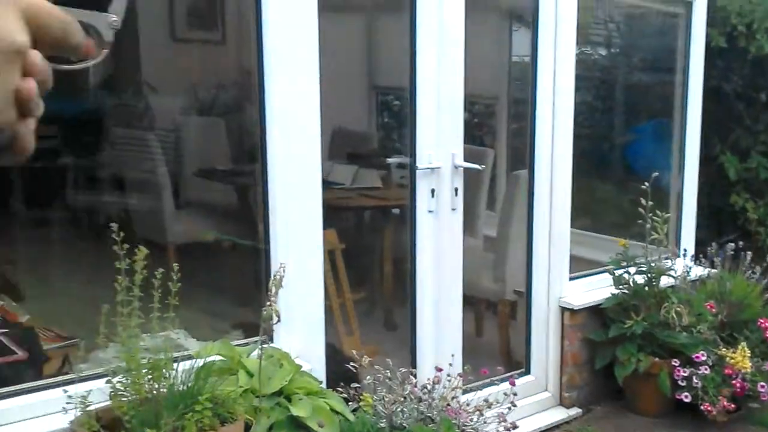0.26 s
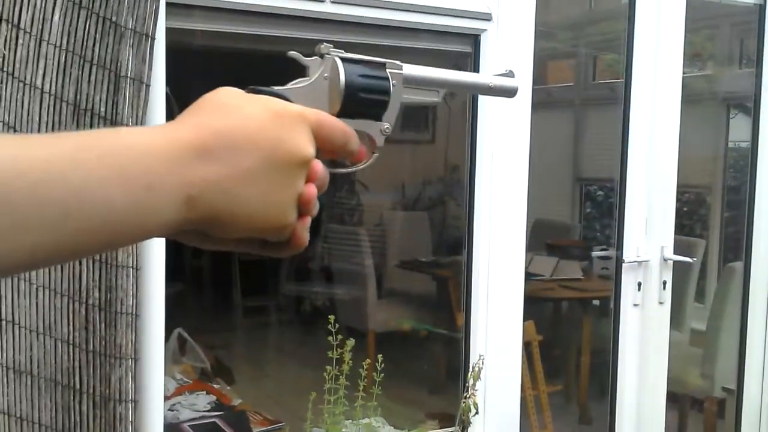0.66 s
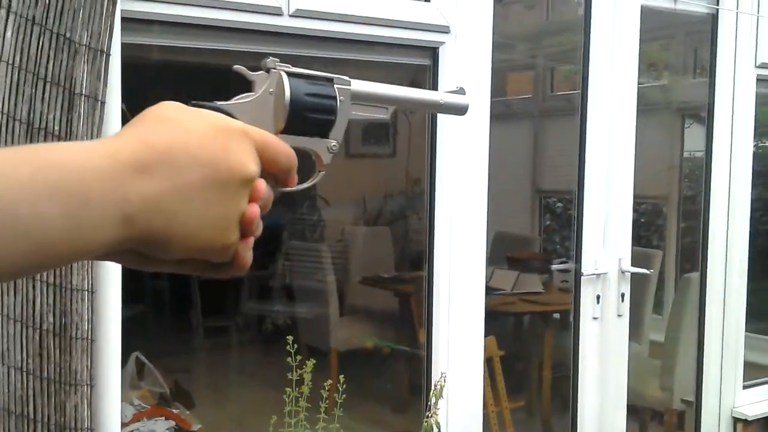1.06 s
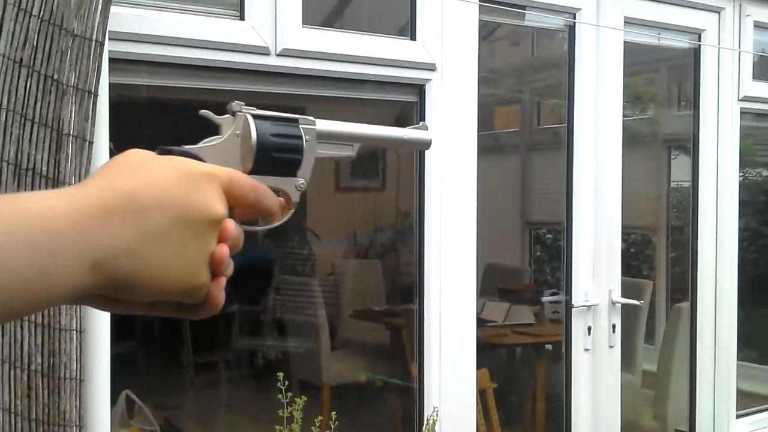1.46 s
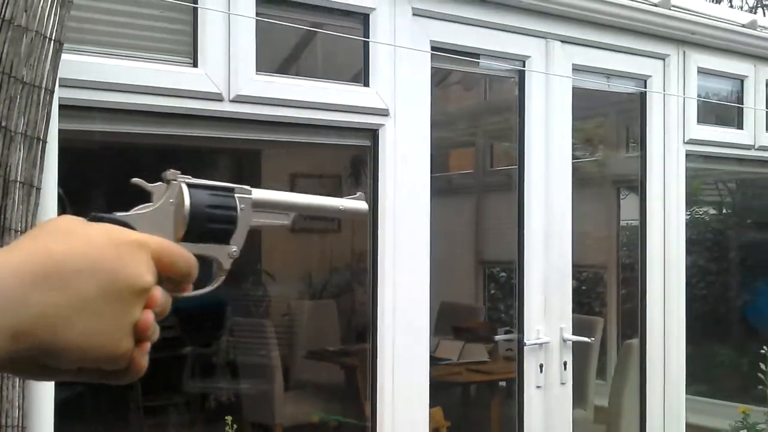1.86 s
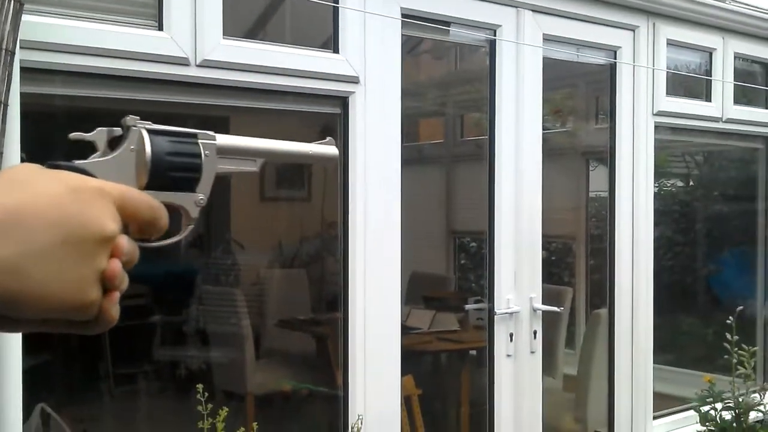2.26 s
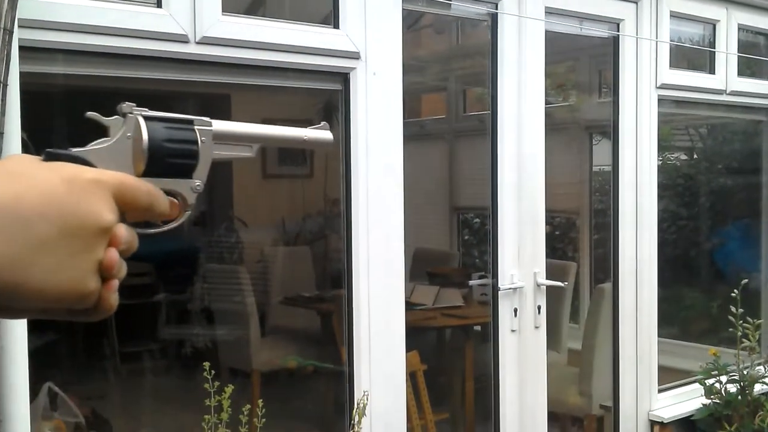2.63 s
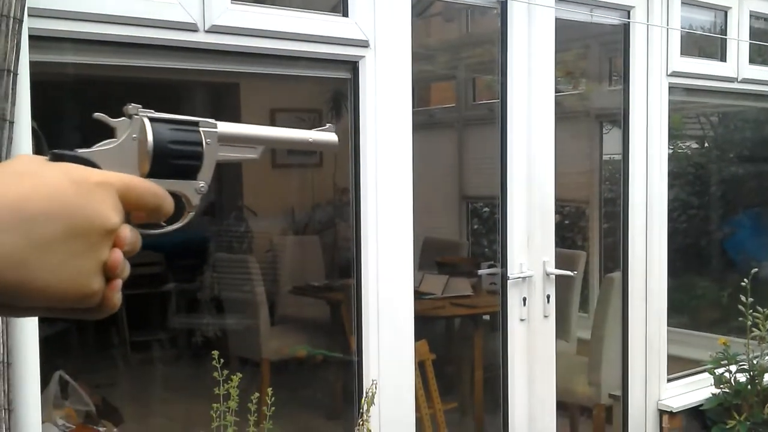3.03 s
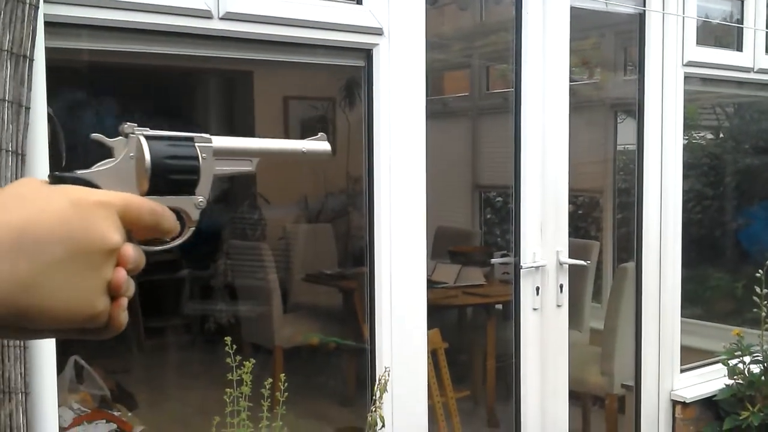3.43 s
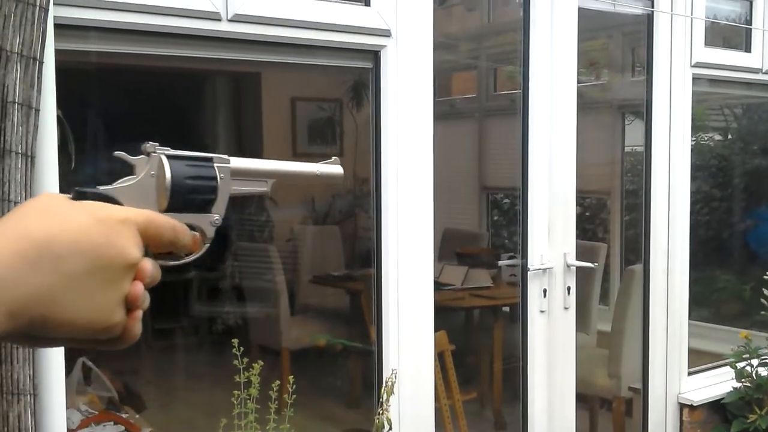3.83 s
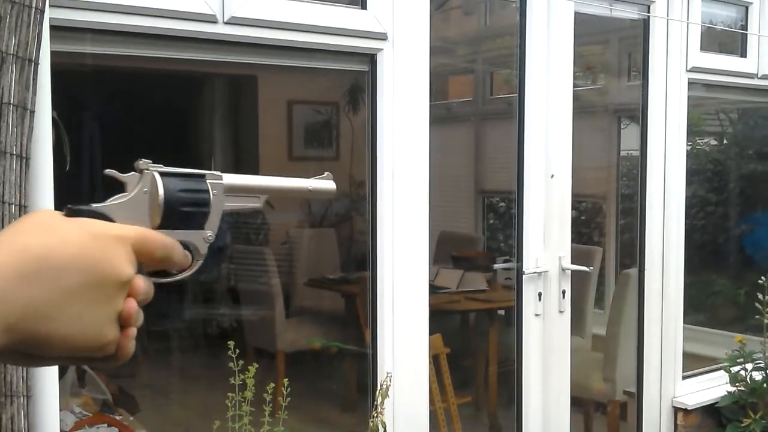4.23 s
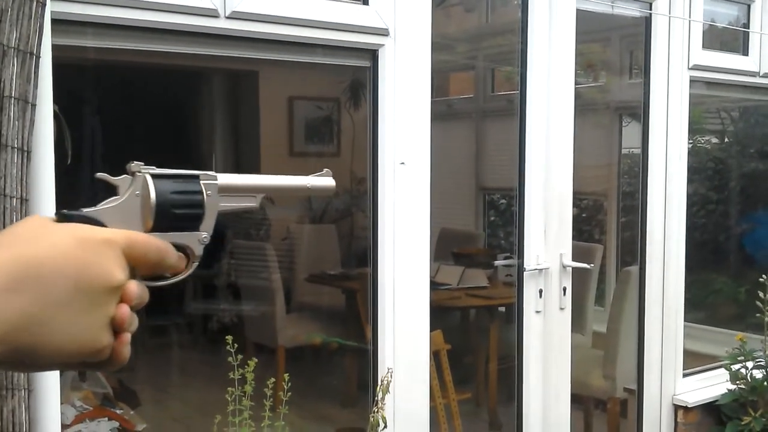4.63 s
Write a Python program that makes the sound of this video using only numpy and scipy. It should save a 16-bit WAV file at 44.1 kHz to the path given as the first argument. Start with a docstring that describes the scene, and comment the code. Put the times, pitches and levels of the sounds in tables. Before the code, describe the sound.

A toy cap revolver fires three sharp bangs in a quiet garden, with metallic hammer clacks and trigger clicks between them.

```python
"""Toy revolver in a garden

A die-cast toy revolver is worked close to the microphone, beside a glass conservatory. Each pull drops
the hammer: three caps explode and overload the input, the other pulls only clack. The trigger clicks
back between pulls. Glass, paving and a far house answer, over faint garden air and a light breeze."""
import sys
import numpy as np
from scipy import signal
from scipy.fft import rfft, irfft, next_fast_len
from scipy.io import wavfile
from scipy.ndimage import map_coordinates

SR = 44100
rng = np.random.default_rng(int(sys.argv[2]) if len(sys.argv) > 2 else 0)


def pcm_store(signal):
    """Save signal as 16-bit PCM."""
    levels = np.round(np.clip(np.atleast_2d(signal), -1, 1) * 32767)
    wavfile.write(sys.argv[1], SR, levels.astype(np.int16).T)


N = 215693
T = np.arange(SR // 2) / SR  # seconds within one short sound
CLOCK = np.arange(N) / SR  # seconds within the scene
STRIKE_RISE_S = 0.0013  # a metal contact takes this long to build up

# exploding caps: start_s, blast_db, blast_t60_s, echo_db, tilt_db_per_octave,
# push_db, push_hz, push_t60_s, lock_db
CAP_SHOTS = [(1.083, 5, 0.041, -18, 0.64, -1, 46, 0.032, -38),
             (3.207, 6.5, 0.06, -16.5, 0.07, 19.5, 128.6, 0.0067, -68),
             (3.637, 8, 0.062, -16, 0.04, 16, 75, 0.022, -54)]
# hammer falls on dead caps: start_s, level_db, ring_db, sear_db, lock_db
DEAD_PULLS = [(1.7311, -19.5, -4, -16, -50), (2.3431, -13.5, -25, -25.5, -64),
              (2.7952, -23.5, -13, -18.5, -52), (4.0277, -21, -16, -14, -64),
              (4.8787, -21.5, -15, -11, -64)]
# spectrum of the hammer and sear contacts: frequency_hz, level_db
CLACK_COLOUR = [(150, -39), (400, -23.5), (800, -18), (1200, -14.5), (1900, -8), (2700, -15.5), (3900, -2),
                (4800, -1), (5900, -5), (7400, -18), (8400, -14), (12500, -25), (16000, -24)]
# modes of the gun's cast frame: pitch_hz, level_db, t60_s
FRAME_MODES = [(1514, 0, 0.048), (1694, -7, .04), (1844, -4.5, 0.087), (2190, -2.5, .032),
               (2300, -3, 0.026), (3754, 3.5, 0.024), (5870, 1, 0.036), (8140, -3, 0.011)]


def amp(db):
    """Decibels to gain."""
    return 10 ** (np.asarray(db) / 20)


def unit(x):
    """Scale to rms 1."""
    return x / np.sqrt(np.mean(x ** 2) + 1e-20)


def along(points, hz):
    """Read (frequency_hz, value) points on a log frequency axis."""
    knots_hz, values = np.transpose(points)
    return np.interp(np.log(hz + 1), np.log(knots_hz + 1), values)


def fade(t60, t=T):
    """Exponential decay by 60 dB in t60 seconds."""
    return np.exp(-np.log(1000) * t / np.maximum(t60, 1e-4))


def swell(middle_s, half_s, t=CLOCK):
    """A bell-shaped rise and fall."""
    return np.exp(-((t - middle_s) / half_s) ** 2)


def wobble(rate):
    """A smooth random curve, rate knots a second."""
    return map_coordinates(rng.standard_normal(int(N * rate / SR) + 4), [CLOCK * rate])


def add(track, start_s, sound):
    """Mix a sound into the track."""
    start = max(round(start_s * SR), 0)
    part = track[start:start + len(sound)]
    part += sound[:len(part)]


def coloured(x, spectrum):
    """Causal filter of the given spectrum that keeps the power of white noise."""
    size = 2 * next_fast_len(len(x))
    gain = unit(amp(along(spectrum, np.fft.rfftfreq(size, 1 / SR))))
    cepstrum = irfft(np.log(np.maximum(gain, 1e-6)))
    # minimum phase: nothing sounds ahead of the strike
    cepstrum[1:size // 2] *= 2
    cepstrum[size // 2 + 1:] = 0
    return irfft(rfft(x, size) * np.exp(rfft(cepstrum)))[:len(x)]


def burst(envelope):
    """White noise carrying the energy of its envelope."""
    noise = rng.standard_normal(len(T)) * envelope
    return unit(noise) * np.sqrt(np.mean(envelope ** 2))


def contact(rise_s, t60):
    """Loose parts scrape together for an instant, then strike."""
    return burst(np.minimum(T / rise_s, 1) ** 2 * fade(t60, np.maximum(T - rise_s, 0)))


def ring(modes, rise_s):
    """Damped metal modes, struck at new strengths every time."""
    tones = np.zeros(len(T))
    for hz, db, t60 in modes:
        strength, detune, phase = rng.standard_normal(3)
        cycles = hz * (1 + 0.00077 * detune) * T + phase
        tones += amp(db + 2 * strength) * fade(t60) * np.sin(2 * np.pi * cycles)
    return tones * np.minimum(T / rise_s, 1) ** 2


def garden_air():
    """A soft, nearly even hiss lies behind everything."""
    # course of the hiss: time_s, level_db
    hiss_levels = [(0, -62.5), (.7, -65), (2.6, -63.5), (4.15, -63), (4.45, -66)]
    # spectrum of the hiss: frequency_hz, level_db
    air_colour = [(100, -6), (350, -8), (700, -11), (1300, -13), (2400, -16.5), (3300, -12.5), (4000, -8),
                  (4700, -5.5), (5800, -18.5), (7500, -19.5), (9000, -27.5), (16000, -28.5)]
    level = amp(np.interp(CLOCK, *np.transpose(hiss_levels)))
    return level * unit(coloured(rng.standard_normal(N), air_colour))


def breeze(calm_db=-65.5, gust_db=8, flutter_db=1.5):
    """Wind rumbles on the microphone, with one broad gust and a few puffs."""
    # spectrum of the rumble: frequency_hz, level_db
    wind_colour = [(12, -25.5), (20, 4.5), (51, 0), (216, -18.5), (274, -29.5), (300, -32.5), (390, -45),
                   (660, -120)]
    # strongest puffs of wind: middle_s, level_db
    puffs = [(0.02, -50.5), (2.34, -55), (3.063, -53.5), (3.429, -52), (4.217, -53)]
    rumble = unit(coloured(rng.standard_normal(N), wind_colour))
    flow = amp(calm_db + gust_db * swell(3.55, half_s=0.6) + flutter_db * wobble(rate=5.6))
    flow += sum(amp(db) * swell(middle_s, half_s=0.035) for middle_s, db in puffs)
    return flow * rumble


def pawl(lock_lead_s=0.025):
    """The pawl ticks as it reseats, and the cylinder locks just before the hammer falls."""
    # the pawl ticks as it reseats, most soon after the trigger springs back: start_s, level_db
    reseat_ticks = [(0.840, -51), (1.0117, -44), (2.675, -43), (3.046, -45), (3.520, -38), (3.922, -42)]
    # spectrum of the tick: frequency_hz, level_db
    tick_colour = [(300, -35), (1000, -24), (1900, -14.5), (2700, -13.5), (3800, -2.5), (4650, 2.5),
                   (5800, -14), (8000, -20), (16000, -39.5)]
    locks = [(start_s - lock_lead_s, lock_db) for start_s, *_, lock_db in CAP_SHOTS + DEAD_PULLS]
    for events, tick_db, ring_db in [(reseat_ticks, -0.5, -15), (locks, -5, 0.5)]:
        for start_s, db in events:
            tick = amp(tick_db) * coloured(contact(STRIKE_RISE_S, t60=0.0061), tick_colour)
            tick += amp(ring_db) * ring(FRAME_MODES[:4], rise_s=0.004)
            yield start_s, amp(db) * (walls(tick, db=1) + amp(-13.5) * garden_echo(tick, tick_colour))


def walls(x, db):
    """The direct sound and its first reflections off glass and paving; db trims the reflections."""
    # nearby surfaces: delay_s, level_db
    reflections = [(.0045, -6.5), (.0062, -16.5), (.009, -15), (0.012, -15)]
    out = x.copy()
    for delay_s, level_db in reflections:
        add(out, delay_s + 0.00013 * rng.standard_normal(), amp(level_db + db) * x)
    return out


def garden_echo(x, spectrum):
    """House, fences and shrubs scatter the energy of a short sound into a dense tail."""
    # decay of the tail: frequency_hz, t60_s
    tail_decay = [(150, 0.39), (600, 0.36), (2000, 0.48), (4500, 0.2747), (8000, 0.2924), (15000, 0.18)]
    # colour the garden adds: frequency_hz, gain_db
    tail_colour = [(100, -12.5), (500, -1.5), (1100, -1.5), (2000, 0), (3700, 2.5), (4700, 5), (5700, 4.5),
                   (15000, 7.5)]
    hz, t, bands = signal.stft(rng.standard_normal(len(T)), SR, nperseg=256)
    bands *= fade(along(tail_decay, hz)[:, None], t)
    bands *= amp(along(tail_colour, hz) + along(spectrum, hz))[:, None]
    tail = signal.istft(bands, SR, nperseg=256)[1][:len(T)]
    # reflections build up, and those of the fence arrive in a clump
    tail *= (1 - np.exp(-T / 0.021)) * (1 + swell(0.047, half_s=0.039, t=T))
    return tail * np.linalg.norm(x) / np.linalg.norm(tail)


def sear():
    """The sear scrapes off the hammer just before it falls."""
    scrape = coloured(contact(rise_s=0.00051, t60=0.06), CLACK_COLOUR)
    return amp(-5) * scrape + amp(-4.5) * ring(FRAME_MODES[:4], rise_s=0.0024)


def caps(sear_lead_s=0.007, sear_db=-31):
    """A cap bursts with a crack, close enough for its gas to shove the microphone."""
    # spectrum of the blast: frequency_hz, level_db
    blast_colour = [(120, -37.5), (300, -21.5), (650, -13), (1200, -10), (1700, -11), (2200, -9),
                    (2900, -9.5), (3600, -6), (4200, -3), (4620, 0.5), (5100, -6.5), (5900, -12.5),
                    (7000, -14.5), (8200, -21), (12000, -26), (16000, -24.5)]
    for start_s, db, t60, echo_db, tilt_db, push_db, push_hz, push_t60, _ in CAP_SHOTS:
        colour = [(hz, level_db + tilt_db * np.log2(hz)) for hz, level_db in blast_colour]
        shock_front, gas_rush = 0.97 * fade(0.018), fade(t60)
        crack = coloured(burst(shock_front + gas_rush), colour)
        yield start_s - sear_lead_s, amp(sear_db) * sear()
        yield start_s, amp(db) * (walls(crack, db=-10) + amp(echo_db) * garden_echo(crack, colour))
        yield start_s, amp(push_db) * gas_shove(push_hz, push_t60)


def gas_shove(hz, t60):
    """A jump of pressure, then suction of equal area as the air swings back."""
    swing = np.sin(2 * np.pi * hz * T) * fade(t60)
    return np.gradient(swing, T) / (2 * np.pi * hz)


def far_echo(delay_s=0.3, far_db=-46):
    """Every bang comes back from a far house, dull and smeared; longer blasts return more."""
    # spectrum of the far echo: frequency_hz, level_db
    house_colour = [(600, -30), (1050, -14), (1260, -3.5), (1500, -13), (1900, -8), (3000, -19),
                    (6000, -60)]
    longest_t60 = max(t60 for _, _, t60, *_ in CAP_SHOTS)
    envelope = np.zeros(N)
    for start_s, db, t60, echo_db, *_ in CAP_SHOTS:
        strength = amp(db + echo_db + far_db) * t60 / longest_t60
        envelope += strength * swell(start_s + delay_s, half_s=0.015)
    return envelope * unit(coloured(rng.standard_normal(N), house_colour))


def trigger():
    """The released trigger snaps against its stop, and its spring rings briefly."""
    # trigger returns: start_s, level_db
    releases = [(1.3919, -22), (1.9634, -21.5), (2.5642, -19.5), (2.98, -22), (3.4222, -20), (3.848, -18),
                (4.2799, -19.5)]
    # spectrum of the click at the gun: frequency_hz, level_db
    click_colour = [(200, -29), (600, -40), (1100, -28), (2000, -16), (2600, -18.5), (3300, -5.5),
                    (3900, 5), (4400, -6), (5200, -2.5), (6100, -15), (7800, -21.5), (10700, -26),
                    (13000, -31), (16000, -28.5)]
    # spectrum of the click sent into the garden: frequency_hz, level_db
    echo_colour = [(300, -35), (1100, -25.5), (1900, -13.5), (2600, -11.5), (3400, -1), (4400, -2.5),
                   (5200, 2), (6100, -11), (8000, -19), (16000, -26)]
    # modes of trigger and spring: pitch_hz, level_db, t60_s
    spring_modes = [(2102, -6, 0.036), (3680, 14.5, 0.0085), (3833, -6.5, 0.015), (4800, -5.5, 0.067),
                    (5183, -3, 0.044), (6500, -6.5, 0.075)]
    for start_s, db in releases:
        snap = coloured(contact(STRIKE_RISE_S, t60=0.018), click_colour)
        snap += amp(-12) * ring(spring_modes, rise_s=0.0045)
        at_mic = walls(snap, db=-2.5) + amp(-12.5) * garden_echo(snap, echo_colour)
        yield start_s - STRIKE_RISE_S / 2, amp(db - 3) * at_mic


def hammer(sear_lead_s=0.0081):
    """The hammer strikes a dead cap, chatters and rings the frame."""
    for start_s, db, ring_db, sear_db, _ in DEAD_PULLS:
        strike = contact(STRIKE_RISE_S, t60=0.015)
        chatter = amp(-13.5) * contact(rise_s=0.0026, t60=0.065)
        blow = coloured(strike + chatter, CLACK_COLOUR)
        blow += amp(ring_db) * ring(FRAME_MODES, rise_s=0.00134)
        yield start_s - sear_lead_s, amp(db + sear_db) * sear()
        at_mic = walls(blow, db=-2) + amp(-11.5) * garden_echo(blow, CLACK_COLOUR)
        yield start_s - STRIKE_RISE_S / 2, amp(db - 4) * at_mic


def leaves(db=-63):
    """Leaves hiss softly as a gust passes through the shrubs."""
    # spectrum of the rustle: frequency_hz, level_db
    leaf_colour = [(1000, -21.5), (3000, -7), (5500, 3.5), (7700, -9.5), (9000, -17.5), (16000, -27)]
    return amp(db) * swell(2.6, half_s=0.4) * unit(coloured(rng.standard_normal(N), leaf_colour))


def scene():
    """One microphone, the gun close by and the garden around it."""
    gun = np.zeros(N)
    for start_s, sound in [*caps(), *hammer(), *trigger(), *pawl()]:
        add(gun, start_s, sound)
    return (gun + far_echo() + garden_air() + breeze() + leaves())[None]


def record(dry, ceiling=0.92, top_hz=16000):
    """The bangs clip the input, and a steep low-pass cuts the highest treble."""
    clipped = dry / (1 + np.abs(dry / ceiling) ** 8) ** (1 / 8)
    return signal.sosfilt(signal.butter(18, top_hz, fs=SR, output="sos"), clipped)


dry = scene()
out = record(dry)
pcm_store(out)
```